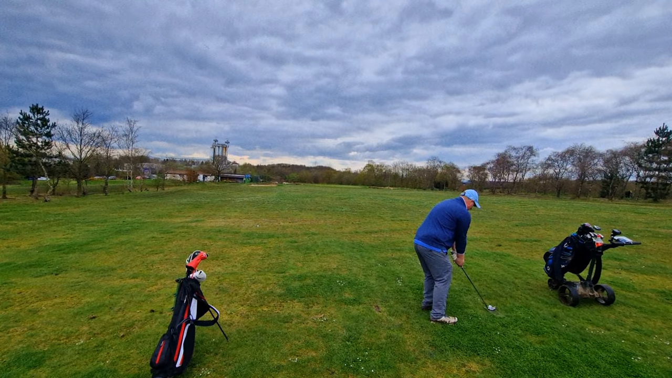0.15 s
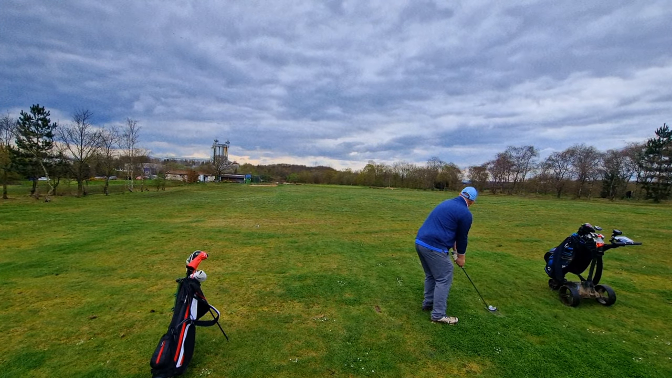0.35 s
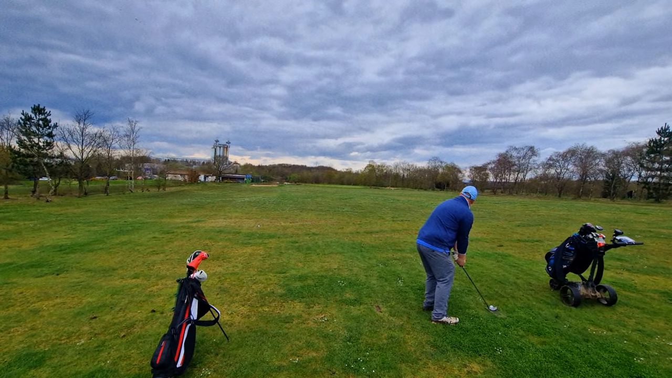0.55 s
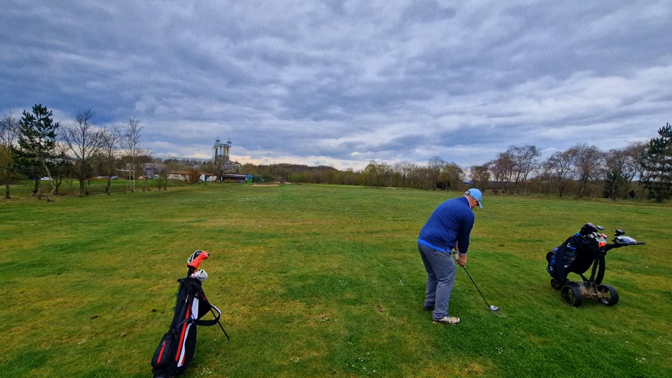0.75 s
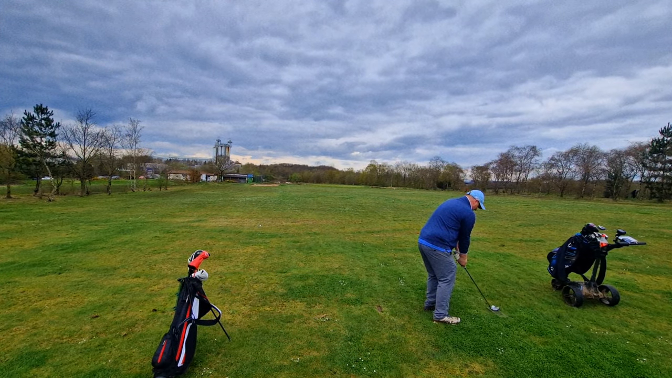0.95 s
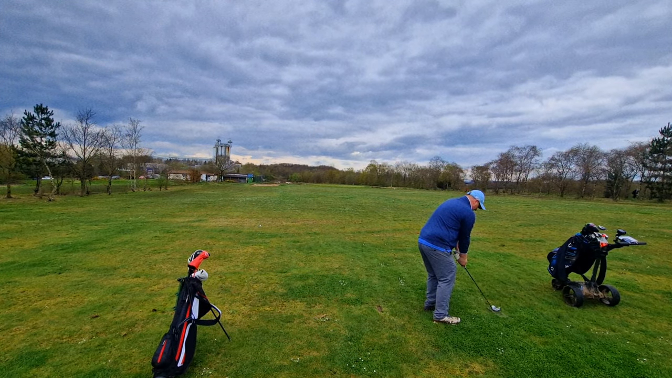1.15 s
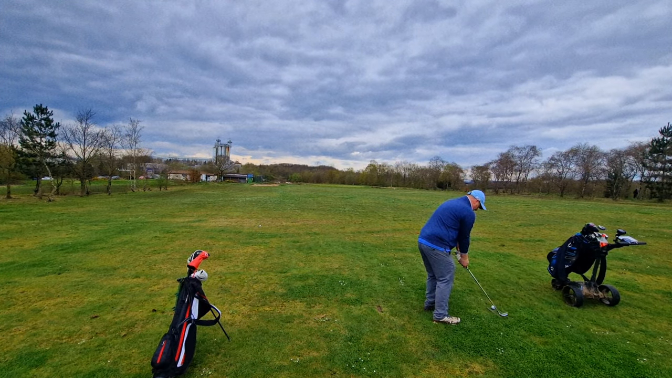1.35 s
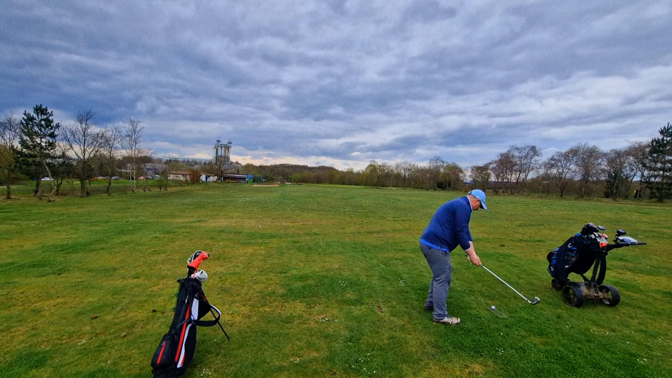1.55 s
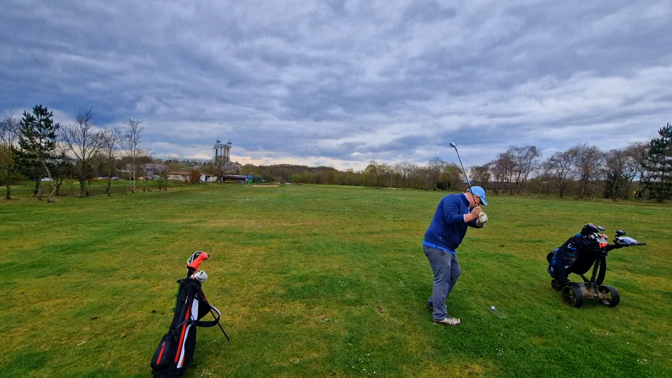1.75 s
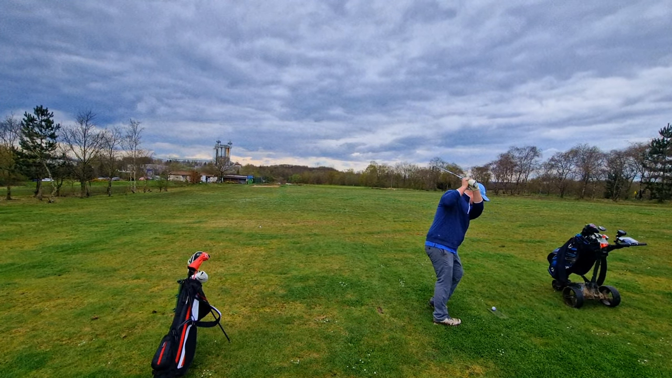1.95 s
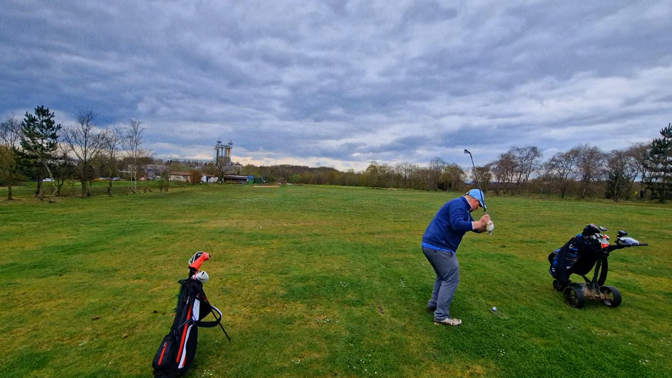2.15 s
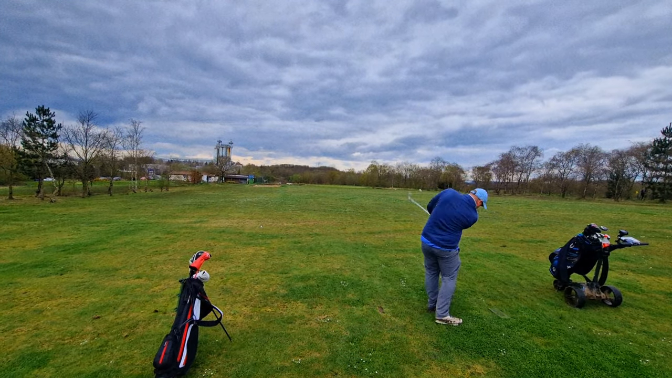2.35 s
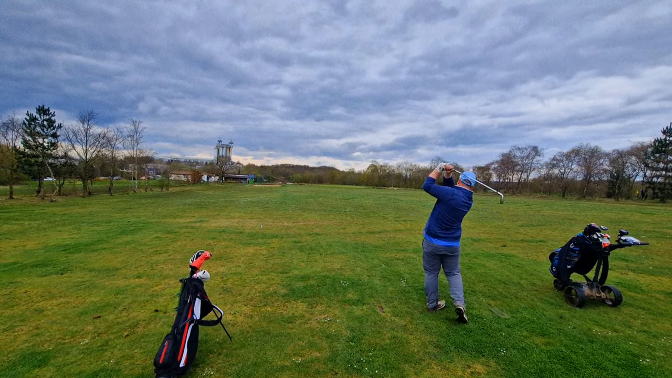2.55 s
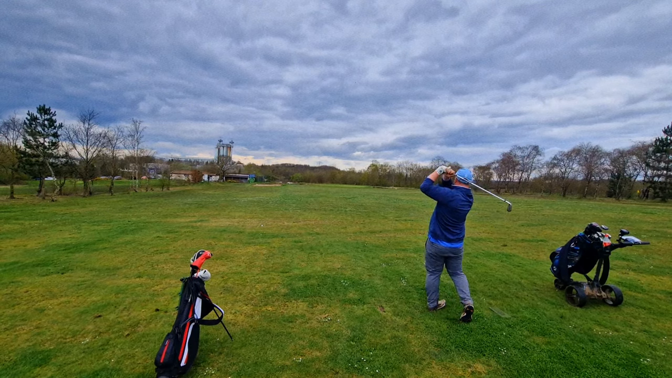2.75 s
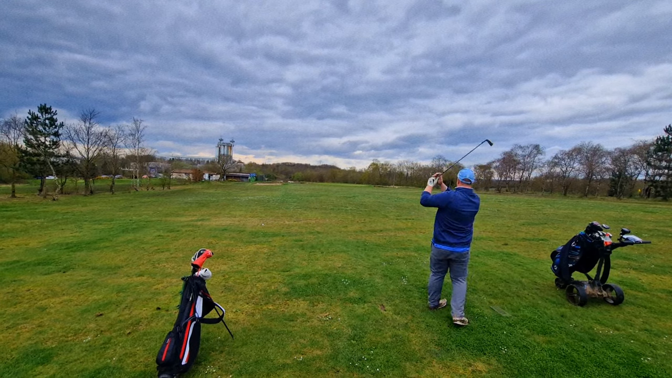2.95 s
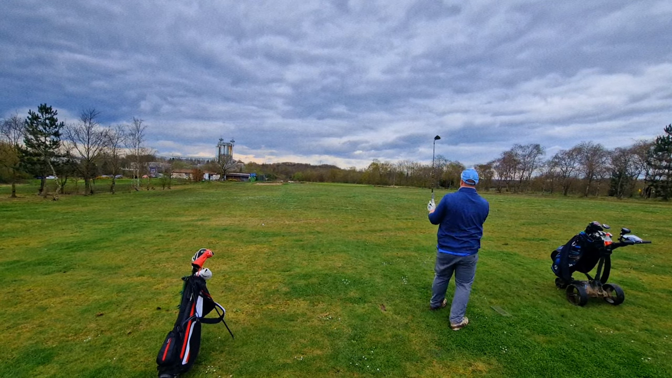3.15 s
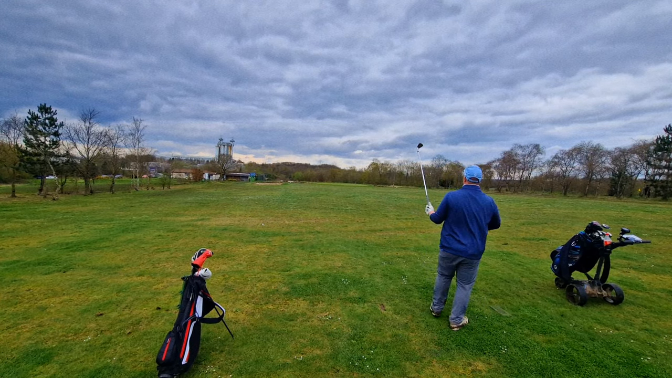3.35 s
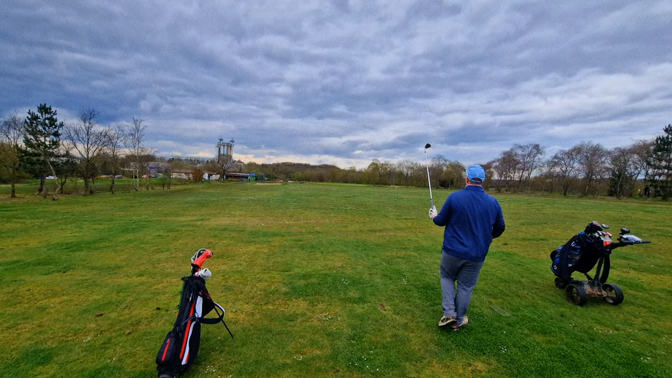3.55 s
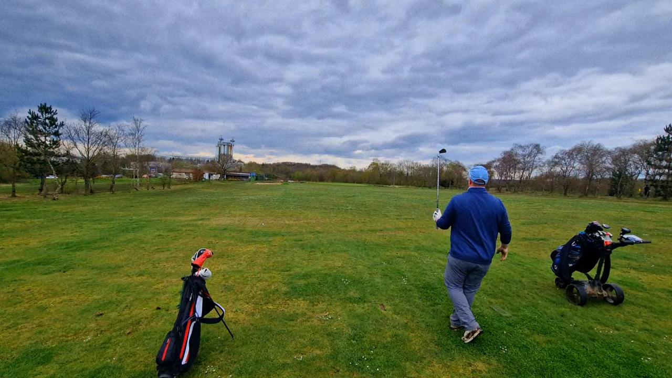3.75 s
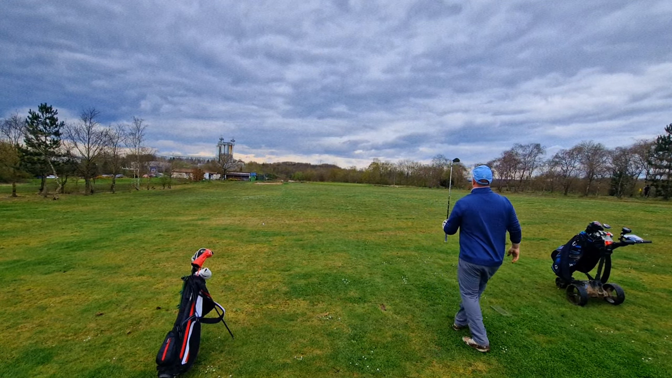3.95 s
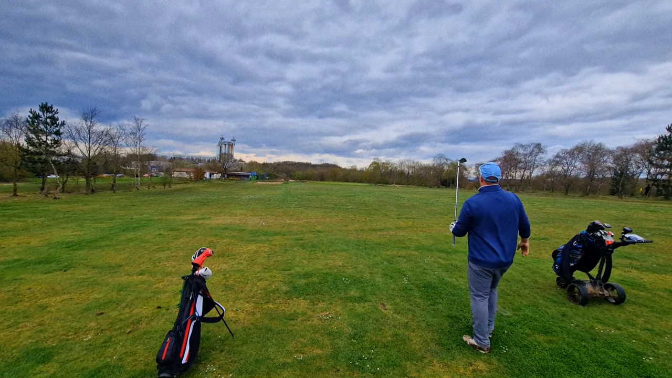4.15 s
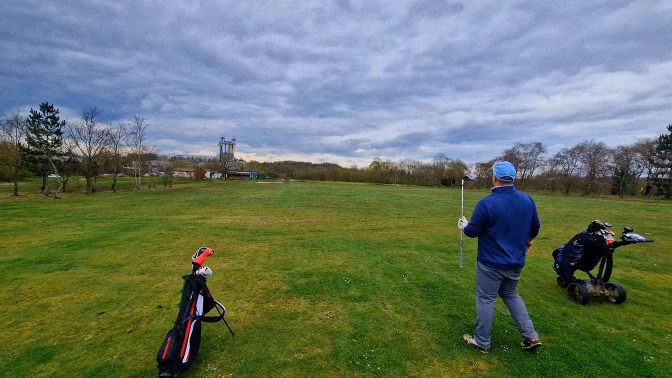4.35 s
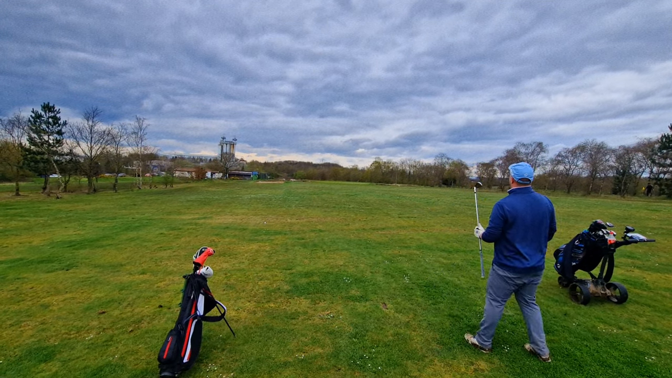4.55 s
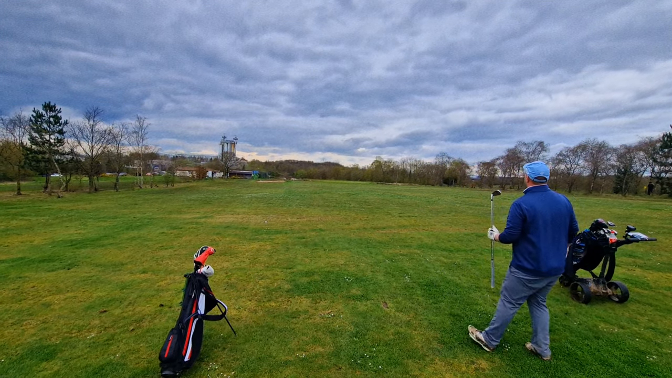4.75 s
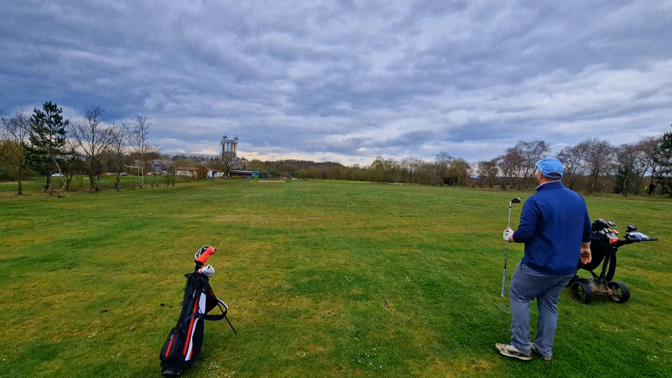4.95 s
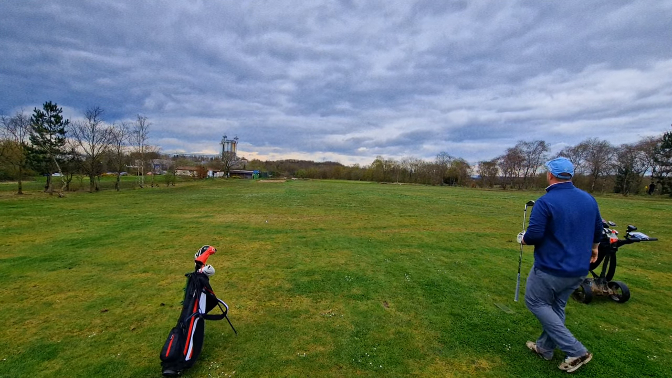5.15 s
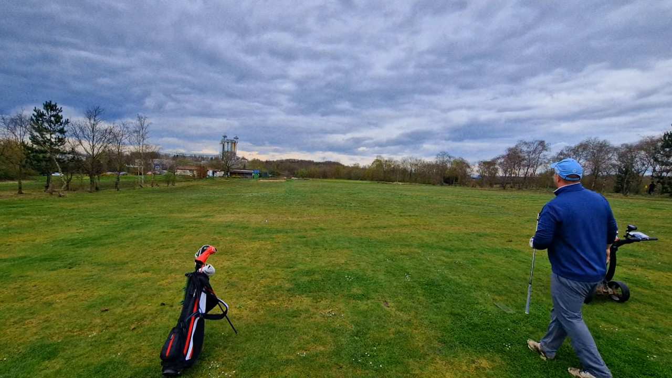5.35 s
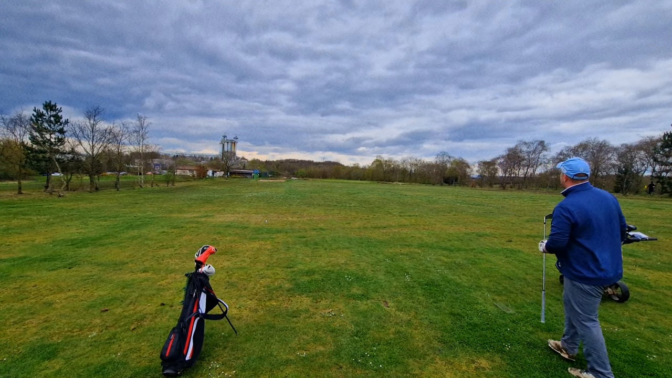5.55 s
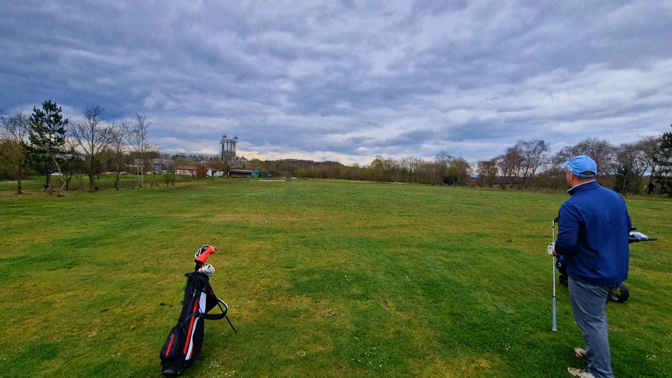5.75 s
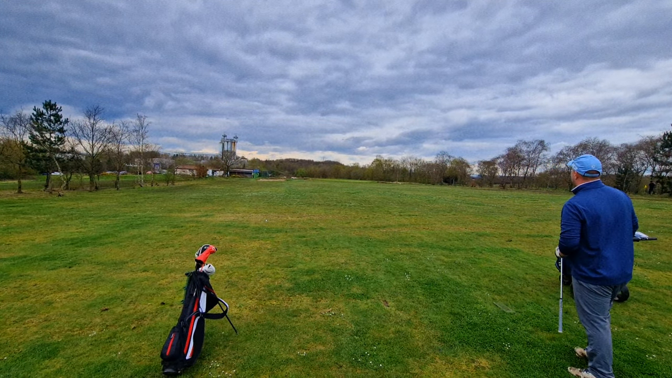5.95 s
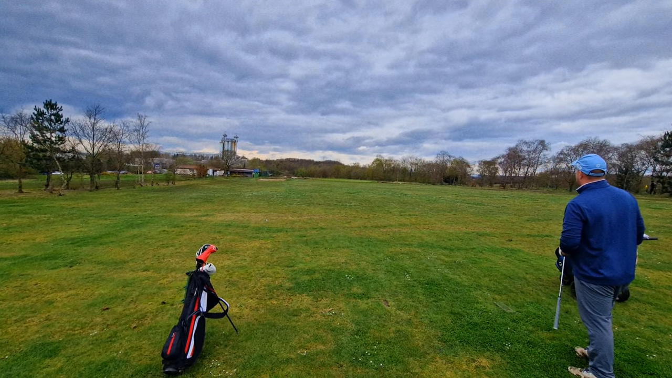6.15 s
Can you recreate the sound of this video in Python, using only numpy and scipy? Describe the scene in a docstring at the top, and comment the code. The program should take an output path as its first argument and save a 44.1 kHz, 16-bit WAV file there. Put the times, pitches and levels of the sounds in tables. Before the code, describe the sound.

A wide outdoor stereo scene, with a quiet, steady low rumble and soft hiss from a far road throughout. Songbirds begin at once: quick high chips and a trill until about 1.2 s, clear held whistles around 2.4 kHz, and faint distant chirping. From 1.7 s one bird repeats thin falling slurs. At about 2.25 s a club's airy swish rises fast, and at 2.34 s comes a single loud, very short crack, bright metal over a hard ball knock, with torn turf. A weak echo follows near 2.6 s, with a soft follow-through whoosh, cloth rustle and tiny soil ticks from 2.4 to 2.7 s, and a few more around 3.0 to 3.35 s. From 3.3 s birds grow busier with arching chips and whistles. Light grassy steps and rustles brush past from roughly 4 to 5.7 s, fading as birds and road continue to about 6 s.

```python
"""Over the steady rumble and hiss of a far road, songbirds trill, whistle and chip from the hedges all round.
After two seconds the shaft of an iron swishes, a swept cluster of noise bands. Ball and club head crack as
decaying sines, noise bursts tear the turf, and echoes follow. Turf patters down in short ticks, then the player
walks off in brushes of grain and hiss through the grass. The birds are gliding sines with a blurred tail; the
road is banded noise with one engine note."""
import sys
import numpy as np
from scipy import signal
from scipy.fft import rfft, irfft, next_fast_len
from scipy.io import wavfile
from scipy.ndimage import uniform_filter1d

SR = 44100
rng = np.random.default_rng(int(sys.argv[2]) if len(sys.argv) > 2 else 0)


def persist_wave(psi):
    """Save psi, clipped to +-1, as 16-bit WAV."""
    counts = np.round(np.clip(psi, -1, 1) * 32767).astype(np.int16)
    wavfile.write(sys.argv[1], SR, np.atleast_2d(counts).T)


N = 273861

STRIKE_LEAD_MS = -0.2016  # left leads by this, so the blow and its debris reach the right first


def undb(db):
    """Decibels to an amplitude factor."""
    return 10 ** (np.asarray(db) / 20)


def unit(x):
    """Scales a sound to an rms of one."""
    return x / np.sqrt(np.mean(x ** 2))


def band(x, hz, width_hz):
    """Fourth-order band-pass around hz."""
    high = min(width_hz / 2 + np.hypot(width_hz / 2, hz), .45 * SR)
    sos = signal.butter(2, [hz ** 2 / high, high], "bandpass", fs=SR, output="sos")
    return signal.sosfilt(sos, x)


def walk(rate):
    """Random levels held 1 / rate s and smoothed twice; spread near 1."""
    k = int(SR / rate)
    steps = np.repeat(rng.standard_normal(N // k + 1), k)
    return 1.3 * uniform_filter1d(uniform_filter1d(steps, k), k)[:N]


def fade(t, t60):
    """Exponential decay by 60 dB in t60 seconds."""
    return np.exp(-np.log(1000) * t / t60)


def add(out, sound, s, pan_db, lead_ms):
    """Places a sound at time s; pan_db is left minus right, and left leads by lead_ms."""
    size = next_fast_len(len(sound) + 64)
    turn = -2j * np.pi * np.arange(size // 2 + 1) / size
    for channel, side in enumerate((1, -1)):
        at = (s - side * lead_ms / 2000) * SR
        start = max(int(at) - 16, 0)
        # a phase turn shifts the sound by fractions of a sample
        piece = irfft(rfft(sound, size) * np.exp(turn * (at - start)), size)[:N - start]
        out[channel, start:start + len(piece)] += undb(side * pan_db / 2) * piece


def road():
    """Noise bands a third of an octave apart swell together and flicker alone; an engine note wavers in the bass."""
    # spectrum of the far road: f/Hz, relative level per Hz/dB
    spectrum = [(15, -34), (25, 0), (92, 0.5), (235, -9.5), (492, -25), (661, -21.5), (957, -20),
                (1320, -29), (2160, -34.5), (2380, -42.5), (2830, -50.5), (3710, -47), (5920, -66),
                (7760, -60.5), (9000, -81), (11700, -109), (19800, -120)]
    # likeness of the two channels: f/Hz, left-right correlation
    likeness = [(60, 1), (200, 0.97), (330, 0.87), (600, -0.3), (1400, -0.27), (3000, 0.45), (8000, 0.44)]
    road_db, drone_hz, drone_width_hz, drone_db = -40, 222.9, 20.6, -52.5
    out, swell = 0, walk(1.0)
    f, per_hz = np.transpose(spectrum)
    g, alike = np.transpose(likeness)
    for hz in 25 * 2 ** np.arange(0, 8.5, 1 / 3):
        noise = rng.standard_normal((2, N + SR))
        # the first second lets the filters settle
        mid, side = band(band(noise, hz, hz / 3), hz, hz / 3)[:, SR:]
        c = np.clip(np.interp(np.log(hz), np.log(g), alike), -.9, .99)
        db = np.interp(np.log(hz), np.log(f), per_hz) + 0.28 * swell + 1.84 * walk(6)
        spread = np.sqrt((1 - c) / (1 + c)) * side * np.array([[1], [-1]])
        out = out + undb(db) * (mid + spread)
    drone = unit(band(rng.standard_normal(N), drone_hz, drone_width_hz))
    return (undb(road_db) * unit(out) + undb(drone_db) * drone) * undb([[.35], [-.35]])


def chorus(start, length, low_hz, high_hz, quietest_db, count):
    """Short faint notes of birds too far off to tell apart, scattered in time, starting pitch, level and side."""
    rows = []
    for when, long, high, glide, loud, side in rng.random((count, 6)):
        hz = low_hz + high * (high_hz - low_hz)
        end_hz = hz * (1 + .3 * (glide - .6))
        s = min(start + when * length, N / SR - .06)
        note_s = .015 + .04 * long ** 2
        rows.append((s, note_s, hz, end_hz, quietest_db + 7.6 * loud, 12 * (side - .5), 0.41 * (side - .5)))
    return rows


def far_birds():
    """A thin chorus throughout, with denser bouts of burbling from a far hedge."""
    # burbling: start t/s, length t/s, lowest starting f/Hz, highest starting f/Hz, quietest level/dB
    burbles = [(0.331, 1.5, 2277, 2600, -75.5), (1.203, 0.46, 3170, 3790, -79.5),
               (3.273, .36, 3200, 4000, -71), (4.297, 0.72, 2400, 4600, -77.5),
               (5.501, .55, 3810, 4800, -80)]
    notes_a_second = 36
    rows = chorus(0, N / SR - .2, 2500, 4600, -83, count=int(notes_a_second * N / SR))
    for bout in burbles:
        rows += chorus(*bout, count=45)
    return rows


def trills():
    """Rows of rising chips that slow down and swell to the middle of each trill."""
    # trills: start t/s, end t/s, first gap t/s, growth of each gap t/s, first chip's low f/Hz,
    # climb f/Hz per chip number squared, peak level/dB, how much quieter the ends are level/dB
    table = [(.005, .41, .046, .0027, 6130, 17, -68, 2), (.484, 1.24, .052, .0016, 3740, -1.5, -60, 14)]
    chip_s, chip_rise_hz, pan_db, lead_ms = 0.016, 335, -5, -0.077
    rows, k = [], np.arange(20)
    for start, end, gap, grows, hz, climb, db, quieter in table:
        starts = start + k * gap + grows * k * (k - 1) / 2
        for n, s in zip(k, starts):
            if s < end:
                low = hz + climb * n ** 2
                off_middle = 2 * (s - start) / (end - start) - 1
                rows.append((s, chip_s, low, low + .81 * chip_rise_hz, low + chip_rise_hz,
                             db - quieter * off_middle ** 2, pan_db, lead_ms))
    return rows


def near_birds():
    """Held whistles, falling slurs, arching chips, diving hooks and faint slides, each a pitch contour in time."""
    # whistles sliding quickly at first: start t/s, length t/s, from f/Hz, to f/Hz,
    # rms level/dB while held, left minus right level/dB, left leads by t/ms
    whistles = [(0.0, .12, 8060, 8070, -84, 13, 0), (.062, .025, 4190, 4850, -68, 5, .04),
                (0.066, 0.09, 7700, 7600, -80, 14, 0), (0.062, .27, 2447, 2318, -50, -2, 0.077),
                (.24, .19, 3470, 3500, -70, 1, -0.073), (.3, .045, 3520, 3530, -61, 8, -0.026),
                (.34, 0.11, 2320, 2330, -68, -2, 0.17), (.5, 0.13, 2376, 2320, -51, -3, 0.073),
                (0.649, 0.032, 2354, 2324, -62, 1, 0.074), (0.717, 0.04, 2560, 2316, -54.5, -2, 0.11),
                (0.879, 0.12, 2450, 2250, -51, -1, 0.078), (1.09, .14, 7180, 6780, -68.5, -3.5, .07),
                (1.162, 0.069, 2530, 2340, -60.5, 4, .13), (1.268, 0.11, 8200, 7970, -82, 18, 0),
                (1.34, .12, 6800, 6700, -69, -5, .07), (1.401, .13, 2422, 2287, -53.5, -2, 0.096),
                (1.55, 0.1, 6650, 6750, -66.5, -3.5, .07), (1.6, 0.034, 2460, 2370, -61, -2, 0.13),
                (1.66, 0.056, 4250, 5300, -76, -1, 0), (1.718, 0.16, 2505, 2860, -58.5, 1, .16),
                (1.819, 0.08, 2457, 2316, -53, -1, .1), (1.845, 0.064, 1807, 2140, -46.5, -2, 0.22),
                (1.929, .17, 1940, 1710, -57, -1, 0.21), (1.971, 0.042, 6250, 6250, -81, 6, 0),
                (3.12, .09, 3900, 3850, -67, -10, 0.046), (3.29, 0.09, 2070, 2153, -62, -5.5, -.09),
                (3.49, .065, 2500, 2390, -66, 4, 0.083), (3.475, 0.04, 6400, 6440, -72, 11, 0.06),
                (3.533, 0.11, 5850, 5640, -71, 7.5, -0.039), (3.655, 0.075, 5340, 3440, -53, 2, -0.075),
                (3.704, 0.082, 3560, 3637, -48.5, 2, -0.11), (3.769, 0.06, 2270, 2134, -57.5, -1, -0.13),
                (3.846, .04, 3300, 2750, -51.5, 3.5, 0.11), (3.89, 0.12, 2700, 2290, -53.5, 0, 0.15),
                (4.0, .155, 2657, 2490, -61.5, 2, 0.14), (4.234, 0.076, 3390, 3480, -53.5, -2, .07),
                (4.364, .12, 2455, 2306, -55.5, -2, 0.11), (4.489, 0.086, 2360, 2480, -62, 0, 0.11),
                (4.39, 0.037, 4000, 3550, -61.5, 1, 0.078), (4.468, .11, 4080, 4270, -63, -2, .05),
                (4.58, .095, 4790, 4300, -59.5, -4, .03), (4.63, 0.044, 2140, 2130, -62, -6, -0.12),
                (4.645, 0.026, 5750, 5300, -65.5, 4, 0), (4.665, .022, 5350, 3700, -64, 6, 0),
                (4.66, 0.026, 2540, 2290, -54, -1, 0.12), (4.765, 0.1, 2443, 2300, -55.5, -3, 0.09),
                (4.83, 0.058, 4520, 4380, -59.5, -6.5, 0), (4.9, 0.13, 2900, 2720, -68, 0, 0.069),
                (4.9, .065, 5300, 5050, -74, 2, 0.025), (5.528, 0.12, 2260, 2360, -64, 1, -0.12),
                (5.592, .16, 4620, 4620, -72, -3, -0.083), (5.96, 0.15, 3970, 3940, -69.5, 5, -.03)]
    # one bird's repeated falling slur: start t/s, length t/s, level/dB
    falls = [(1.729, 0.079, -61), (1.871, 0.079, -62.5), (2.039, 0.068, -62), (2.189, 0.078, -63),
             (2.365, 0.057, -63), (2.53, 0.049, -58), (2.692, 0.052, -60.5), (2.857, 0.074, -62)]
    # chips that arch up and drop away: start t/s, reference f/Hz, level/dB, left minus right level/dB
    arches = [(3.26, 3940, -61, 6), (3.3, 3850, -54.5, 5), (3.339, 3930, -62.5, 6), (3.372, 4120, -59.5, 3),
              (3.405, 4120, -56, 2), (3.452, 4010, -63.5, 8), (3.494, 3900, -61, 7),
              (3.549, 4100, -66.5, 6), (3.58, 3680, -56, 2), (3.61, 3530, -66, -2), (4.18, 3620, -64, -1),
              (4.328, 4420, -62.5, -2), (4.57, 4720, -60, -4), (5.174, 4370, -59, -3),
              (5.255, 4330, -66, -8), (5.456, 4670, -53.5, -9), (5.53, 4700, -61.5, -9),
              (5.905, 4500, -61.5, -5.5), (6.055, 4690, -70.5, -12)]
    # a call that dives, holds and drops off: start t/s, level/dB
    hooks = [(4.215, -65.5), (5.06, -61), (5.785, -64)]
    settled_at_middle = .68  # share of a whistle's slide done by half its length
    fall_hz, fall_pan_db, fall_lead_ms = [5650, 5690, 5330, 4950, 4550], -6.5, 0.053
    arch_s, arch_shape, arch_lead_ms = 0.0301, np.array([.98, 0.99, .97, .9]), 0.029  # shape scales the pitch
    hook_s, hook_hz, hook_pan_db = .082, [6800, 5300, 4660, 4700, 4760, 4530, 3800], -1
    slide_start_s, slide_every_s, slide_s, slide_hz, slide_db = .178, .224, .08, [6940, 4530], -88
    rows = []
    for s, length, a, b, *rest in whistles:
        rows.append((s, length, a, a + settled_at_middle * (b - a), b, *rest))
    rows += [(s, length, *fall_hz, db, fall_pan_db, fall_lead_ms) for s, length, db in falls]
    rows += [(s, arch_s, *(hz * arch_shape), db, pan_db, arch_lead_ms) for s, hz, db, pan_db in arches]
    rows += [(s, hook_s, *hook_hz, db, hook_pan_db, 0) for s, db in hooks]
    rows += [(slide_start_s + k * slide_every_s, slide_s, *slide_hz, slide_db, 0, 0) for k in range(4)]
    return rows


def hedge_blur(out):
    """Hedges and trees blur the songs with a decaying noise tail; leaves and air swallow its highest notes."""
    t60_s, tail_db, top_hz = .4, -8, 4000  # level ahead of the treble cut
    t = np.arange(SR // 2) / SR
    tail = rng.standard_normal((2, len(t))) * fade(t, t60_s) * np.minimum(t / .015, 1)
    tail /= np.sqrt(np.sum(tail ** 2, axis=1, keepdims=True))
    tail = signal.sosfilt(signal.butter(2, top_hz, fs=SR, output="sos"), tail)
    return undb(tail_db) * signal.fftconvolve(out, tail, axes=1)[:, :N]


def birds():
    """Gliding sines that swell in, waver in pitch and flutter in level on their way across the field."""
    out = np.zeros((2, N))
    flutter = undb(2.2 * walk(60))
    waver = 1 + 0.0045 * walk(70)
    for s, length, *pitch, db, pan_db, lead_ms in trills() + near_birds() + far_birds():
        u = np.arange(int(length * SR)) / (length * SR)
        hz = np.interp(u, np.linspace(0, 1, len(pitch)), pitch)
        hz = uniform_filter1d(hz, len(u) // 6 + 1, mode="nearest")
        hz = hz * waver[int(s * SR):][:len(u)]
        edge = np.clip(np.minimum(u / 0.22, (1 - u) / 0.19), 0, 1)
        tone = np.sqrt(2) * undb(db) * np.sin(2 * np.pi * np.cumsum(hz) / SR)
        note = np.sin(np.pi / 2 * edge) ** 2 * tone
        add(out, note * flutter[int(s * SR):][:len(u)], s, pan_db, lead_ms)
    return out + hedge_blur(out)


def brushing():
    """Each brush swells, holds and dies away, adding in power: gains of the body and the crisp top."""
    # cloth, falling turf and shoes in grass: full at t/s, holds t/s, relative level/dB, crisp top against body level/dB
    brushes = [(2.41, 0.21, -61, -17), (2.995, 0.11, -66.5, -15.5), (3.249, 0.041, -68, -23.5),
               (3.741, 0.21, -68.5, -17), (4.03, 0.025, -63.5, -10.5), (4.152, 0.022, -68, -16),
               (4.273, 0.021, -66.5, -8.5), (4.414, 0.011, -61, -14), (4.52, .15, -72, -16),
               (4.86, .08, -66, -7), (5.157, 0.054, -60, -11), (5.368, 0.032, -59, -22),
               (5.536, 0.047, -58, -10), (5.662, 0.071, -70.5, -15), (6.043, 0.11, -73.5, -26.5)]
    rise_db_s, fall_db_s = 198, 140.5
    t, power = np.arange(N) / SR, 0
    for s, hold, db, crisp_db in brushes:
        shape_db = db - rise_db_s * np.maximum(s - t, 0) - fall_db_s * np.maximum(t - s - hold, 0)
        power = power + undb(shape_db + np.array([[0], [crisp_db]])) ** 2
    return np.sqrt(power)


def rustle():
    """Cloth and grass: dense tiny grains within a soft hiss, each band of the body flickering alone."""
    # colour of the body: f/Hz, width f/Hz, mean relative level/dB
    colour = [(2550, 990, -6), (4100, 860, -4.5), (6530, 1500, -4), (7340, 990, -3)]
    grain_db, grains_a_second, crisp_hz, crisp_width_hz = -5, 1200, 13000, 7000
    body_gain, crisp_gain = brushing()
    hits = rng.random(N) < grains_a_second / SR
    grains = hits * undb(2.8 * rng.exponential(size=N)) * rng.standard_normal(N)
    hiss = rng.standard_normal((2, N)) * undb(2.5 * walk(40))
    # the grains are common to both channels, the hiss is not
    source = undb(grain_db) * unit(grains) * undb([[-3.0], [1.5]]) + hiss
    body = sum(undb(db + 2 * walk(18)) * unit(band(source, hz, width)) for hz, width, db in colour)
    crisp = unit(band(band(source, crisp_hz, crisp_width_hz), crisp_hz, crisp_width_hz))
    return undb([[-.6], [.6]]) * (body_gain * body + crisp_gain * crisp)


def ticks(out):
    """Crumbs of soil and small snaps: each is a burst of banded noise a few milliseconds long."""
    # ticks: start t/s, peak level/dB ahead of panning, centre f/Hz, left minus right level/dB
    table = [(2.4325, -44, 5560, 1), (2.4723, -39.5, 5200, -1), (2.5054, -60, 6520, -2.0),
             (2.536, -45, 5300, -3.0), (2.5744, -61, 6400, -2.5), (2.617, -52, 6500, -1),
             (2.6314, -47, 4370, 0), (2.6414, -59, 4450, -2.5), (2.6643, -61, 7500, -1),
             (2.6754, -52, 5630, -4), (3.027, -45, 6000, -9), (3.0864, -47.5, 4440, -3.5),
             (3.123, -49.5, 7150, -6), (3.197, -56, 8170, -4), (3.2186, -64, 8040, -2.0),
             (3.348, -53, 4050, -8), (3.93, -62, 4060, -10)]
    t = np.arange(int(.015 * SR)) / SR
    for s, db, hz, pan_db in table:
        burst = rng.standard_normal(len(t)) * np.exp(-t / 0.0014)
        snap = band(band(burst, hz, hz), hz, hz)
        add(out, undb(db) * snap / np.abs(snap).max(), s, pan_db, STRIKE_LEAD_MS)


def swish():
    """Air shed by the club: noise bands whose level and centre sweep up to the blow; then the centre sinks
    while the level drops and swells again in the follow-through."""
    # sweep: t/s, relative level/dB, centre of the head's hiss f/Hz
    sweep = [(2.24, -65, 915), (2.29, -63.5, 1420), (2.317, -55, 2260), (2.338, -47, 2820),
             (2.36, -67, 2200), (2.385, -63.5, 1617), (2.45, -61.5, 1300), (2.52, -54.5, 905)]
    shaft_below, shaft_db = 6, 4.5  # the thin shaft's whoosh lies this many times lower than the head's hiss
    s, db, hz = np.transpose(sweep)
    t = np.arange(N) / SR
    gain = undb(np.interp(t, s, db, -150, -150))
    centre = np.log(np.interp(t, s, hz))
    out = 0
    for step_hz in 250 * 2 ** np.arange(0, 5, .5):
        hiss = np.exp(-((np.log(step_hz) - centre) / .9) ** 2)
        whoosh = undb(shaft_db) * np.exp(-((np.log(step_hz * shaft_below) - centre) / .4) ** 2)
        out = out + (hiss + whoosh) * unit(band(rng.standard_normal((2, N)), step_hz, step_hz / 3))
    return gain * out


def ring(modes, t, sag):
    """Decaying sines; pitch sags as the body relaxes."""
    out = 0
    for hz, db, t60 in modes:
        phase = 2 * np.pi * hz * t * (1 - sag * np.minimum(t / t60, 1))
        out = out + undb(db) * fade(t, t60) * np.sin(phase)
    return out


def ball_tone(t):
    """A half-sine push swells the sagging modes of the ball and the turf under it."""
    # ball and turf: starting f/Hz, relative level/dB, t60 t/s ahead of the choke
    modes = [(115, -24, 0.012), (251, -17.5, 0.035), (501, -20, 0.017), (1174, -6, 0.046),
             (1638, -5.5, .012)]
    contact_ms, sag, choke_s = .25, 0.065, .009
    push = np.sin(np.pi * np.clip(t[:64] * 1000 / contact_ms, 0, 1))
    ball = -undb(1.0) * np.convolve(ring(modes, t, sag), push / push.sum())[:len(t)]
    # the grass chokes the ring to a quarter as club and ball plough through it
    return ball * (.25 + .75 * np.exp(-(t / choke_s) ** 4))


def turf_tear(t):
    """Torn turf: decaying bands of noise."""
    # turf: centre f/Hz, width f/Hz, relative level/dB, t60 t/s
    bands = [(900, 2400, -34.5, 0.13), (2574, 1800, -15.5, 0.021), (7240, 1900, -25.5, 0.047),
             (13500, 3100, -27.5, 0.023)]
    tear = 0
    for hz, width, db, t60 in bands:
        tear = tear + undb(db) * unit(band(rng.standard_normal(len(t)), hz, width)) * fade(t, t60)
    return tear * np.minimum(t / 0.00086, 1)


def strike(out):
    """The club head rings first, the ball tone swells just behind it, the turf tears and echoes follow."""
    # club head: f/Hz, relative level/dB, t60 t/s
    head_modes = [(2536, -24, 0.041), (3640, -20.5, 0.022), (4220, -23.5, 0.009), (5350, -6, 0.0081),
                  (6760, -3.5, 0.0088), (7630, -15.5, 0.02), (9660, -18, .006), (11030, -16, 0.0071),
                  (13400, -19, 0.0038)]
    # the blow, then echoes off the ground and a far row of trees: delay t/s, head gain level/dB, ball gain level/dB
    echoes = [(0, 0.5, 0.5), (.0065, -22, -12), (0.2613, -31.5, -34)]
    strike_s, ball_late_s, head_pan_db, ball_pan_db = 2.3386, .0004, -4, 1.5
    t = np.arange(int(.2 * SR)) / SR
    ball = ball_tone(t)
    head = ring(head_modes, t, 0) * np.minimum(t / 0.0005, 1)
    # the bright head leans right in level, the ball slightly left
    for late_s, head_db, ball_db in echoes:
        at = strike_s + late_s
        add(out, undb(head_db) * head, at, head_pan_db, STRIKE_LEAD_MS)
        add(out, undb(ball_db) * ball, at + ball_late_s, ball_pan_db, STRIKE_LEAD_MS)
    # two separate tears, one to each side, widen the turf
    for pan_db in (-5, 3):
        add(out, turf_tear(t), strike_s, pan_db, STRIKE_LEAD_MS)


def scene():
    """Road, rustle, swish and birds, with the blow and its ticks on top."""
    out = road() + rustle() + swish() + birds()
    strike(out)
    ticks(out)
    return out


def record(dry):
    """The microphone dips near 9.5 kHz and hisses faintly; the deepest bass is cut, peaks clip, the top is cut."""
    self_noise_db, top_hz = -90.5, 15800
    heard = dry - .8 * band(dry, 9500, 1300)
    heard = heard + undb(self_noise_db) * rng.standard_normal(dry.shape)
    heard = signal.sosfilt(signal.butter(2, 30, "highpass", fs=SR, output="sos"), heard)
    top_cut = signal.ellip(10, .2, 80, top_hz, fs=SR, output="sos")
    return signal.sosfilt(top_cut, np.clip(heard, -1, 1))


dry = scene()
out = record(dry)
persist_wave(out)
```